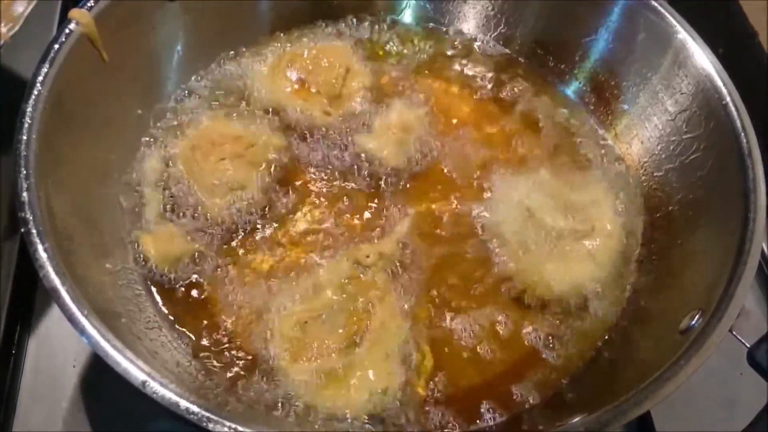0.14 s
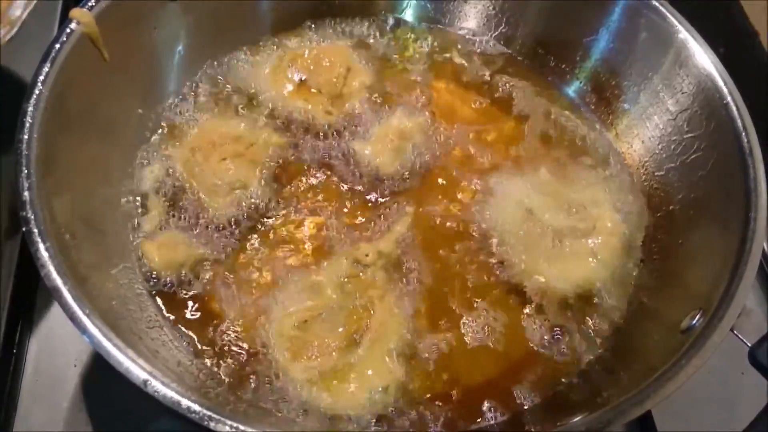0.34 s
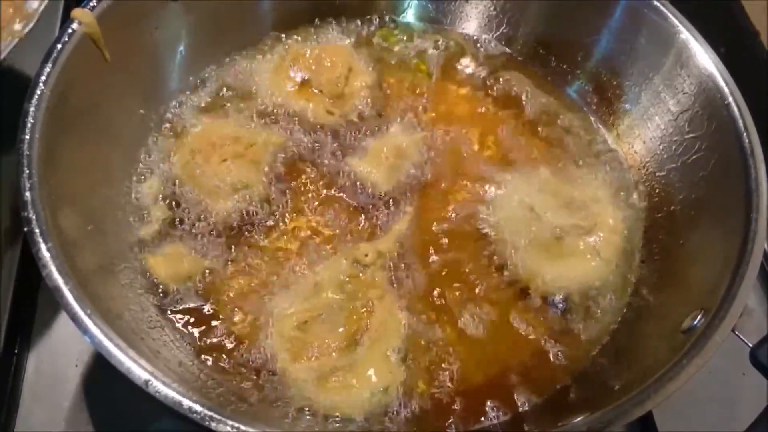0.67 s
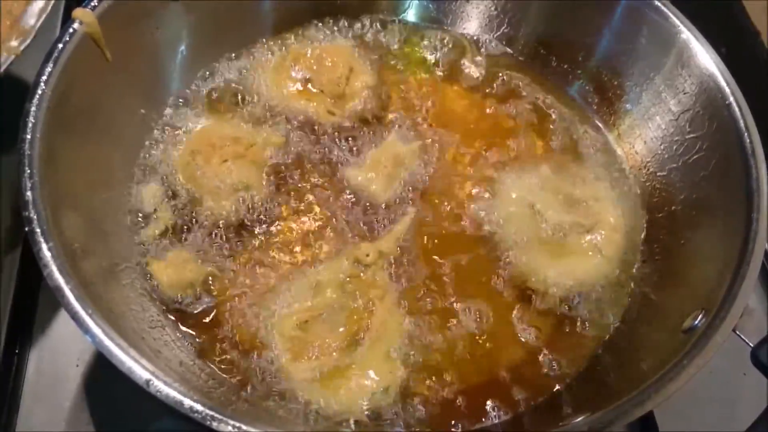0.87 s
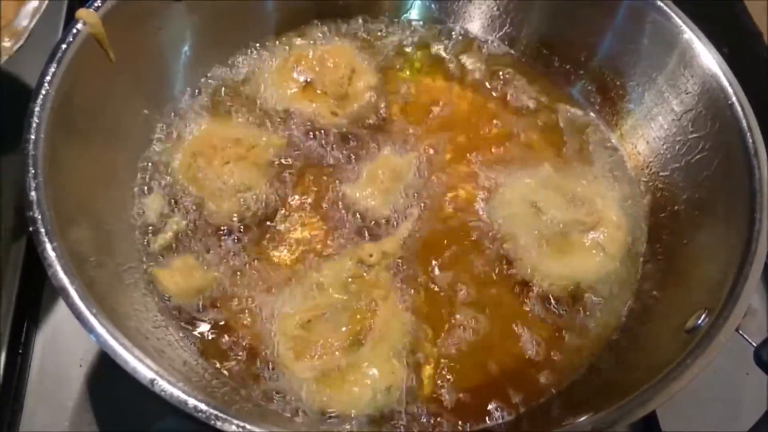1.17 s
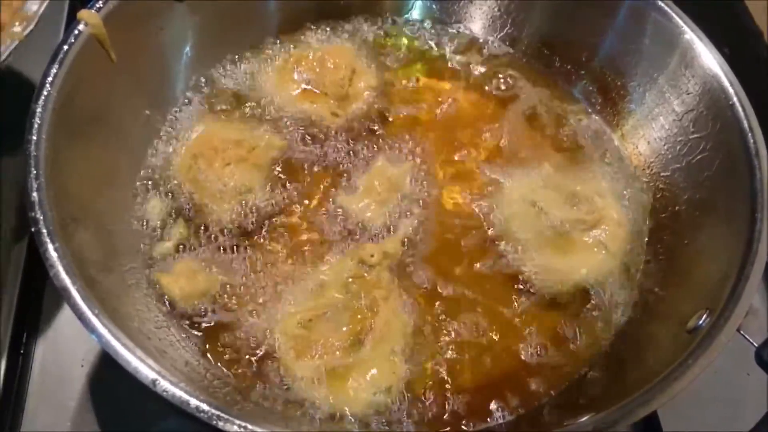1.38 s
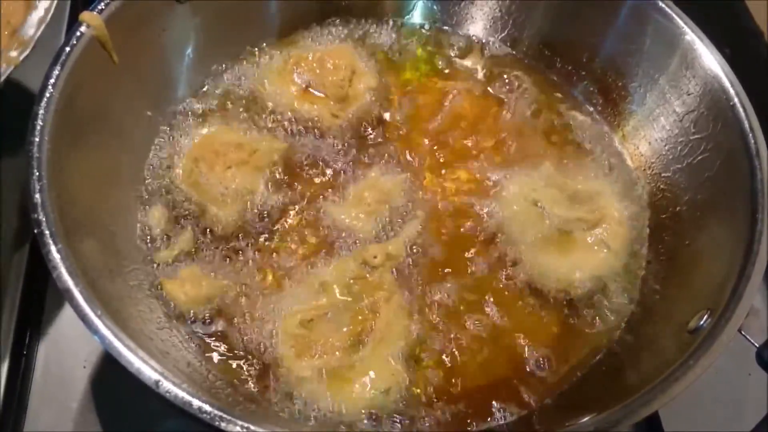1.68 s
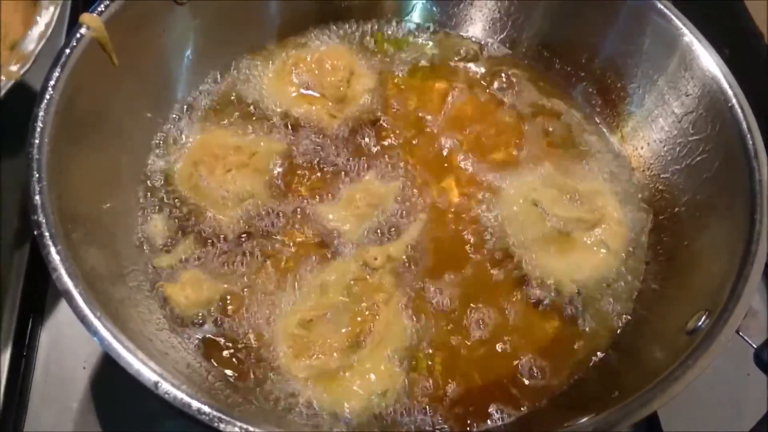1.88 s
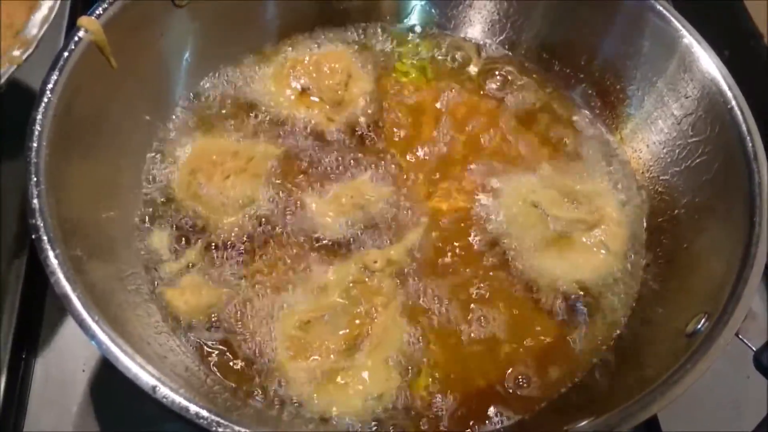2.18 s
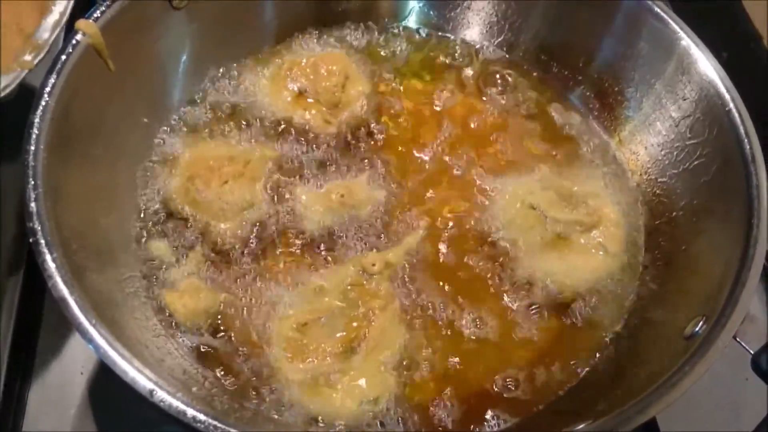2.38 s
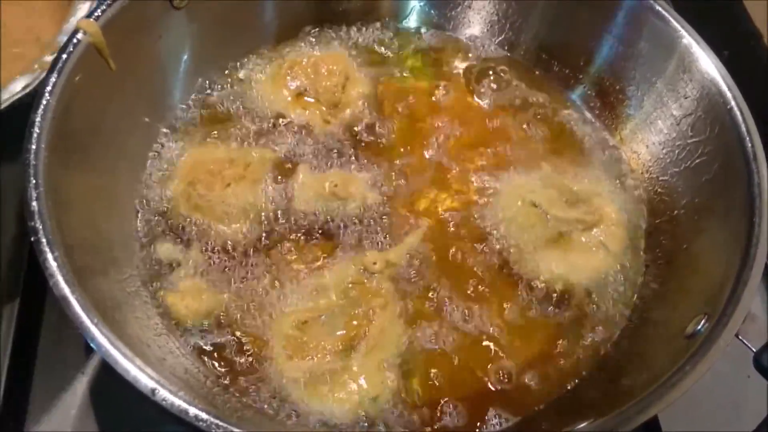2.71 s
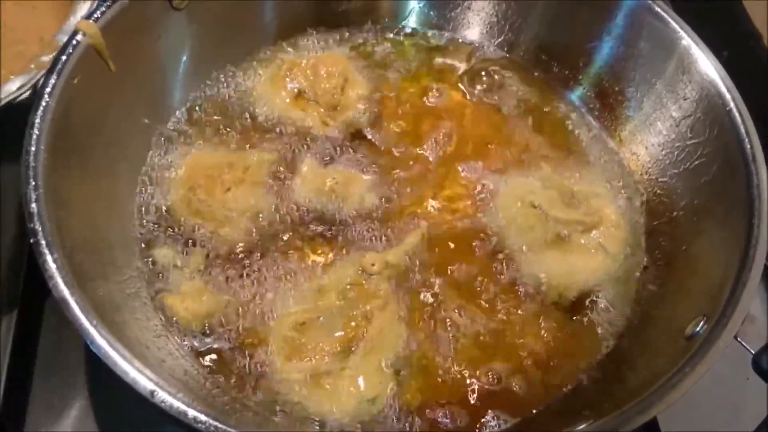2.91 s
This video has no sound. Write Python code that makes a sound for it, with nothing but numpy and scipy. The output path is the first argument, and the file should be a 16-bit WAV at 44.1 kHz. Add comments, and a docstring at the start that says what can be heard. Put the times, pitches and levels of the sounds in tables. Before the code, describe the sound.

Deep-frying food makes a steady, hissing sizzle close to the microphone. Scattered pops and bubbly plops ring briefly in the pan and grow more frequent, with a louder plop near the end, above a soft kitchen rumble.

```python
"""A dense sizzle, dotted with pops: battered slices deep-fry in a steel pan in a small kitchen.
Countless tiny steam bubbles sizzle, larger ones crackle, and the largest pop with a short ring that
the pan and room echo. A phone is held close: its two microphone ports colour the sound differently,
and the left hears the pan first. Underneath lies a low rumble of flame and kitchen, which the phone's
processing puts in opposite phase between left and right."""
import sys
import numpy as np
from scipy import signal
from scipy.fft import rfft, irfft, next_fast_len
from scipy.io import wavfile

SR = 44100
rng = np.random.default_rng(int(sys.argv[2]) if len(sys.argv) > 2 else 0)


def wav_record(signal):
    """Record a signal, one row per channel, as 16-bit PCM in the file named by sys.argv[1]."""
    frames = np.transpose(np.atleast_2d(signal))
    bounded = np.clip(frames, -1, 1)
    # unit amplitude maps onto the largest positive 16-bit level
    quanta = np.round(bounded * 32767).astype(np.int16)
    wavfile.write(sys.argv[1], SR, quanta)


N = 134505
TIME_S = np.arange(N) / SR


# Vigour of the frying, close to the pan: time_s, level_db
SIZZLE_VIGOUR = [(0, -51), (1.5, -50), (2.1, -48), (2.45, -50), (2.65, -49.5), (3.05, -50)]
def sizzle(vigour_db):
    """Tiny steam bubbles burst so thickly that their clicks merge."""
    return from_db(vigour_db) * pair(lambda: rms_one(clicks(per_s=9000, spread_db=2.5)), diffuse=0.73)


# Loud pops in the oil, close to the phone:
# start_s, level_db, centre_hz, left_over_right_db, width_octaves, edge_over_body_db
LOUD_POPS = [(0.1272, -36.5, 7000, 5.5, 0.24, -21.9), (0.4527, -35.5, 3140, -2, 0.61, -20),
             (0.5248, -39.5, 5000, -1, 1.1, 0), (0.6615, -28, 3780, 1, 0.61, -9),
             (0.9126, -38, 3370, -2.5, 2.6, -12.9), (1.1565, -35, 7600, -4, 0.6, -19),
             (1.2148, -29.5, 5170, -1.5, 1, -16), (1.2287, -30, 9500, 0.5, 0.58, -6),
             (1.2488, -35, 10000, 0, 0.93, -2), (1.5051, -23.5, 5180, 0, 0.44, -13.9),
             (1.51, -32, 5070, -11, 0.82, -14.9), (1.5348, -33.5, 3970, -5, 1.7, -11),
             (1.5948, -33, 5600, -6, 1.1, -1.5), (1.7462, -38.5, 9010, 1, 0.72, -11.9),
             (1.8128, -37, 3600, -4.2, 0.84, -4), (1.8978, -32, 7310, -1.5, 1.5, -3),
             (1.943, -33.5, 8110, -1, 1.8, -14), (1.9938, -35, 9490, 0, 1.2, -16),
             (2.0074, -35.5, 7900, -2, 0.45, 0), (2.0427, -34.5, 10000, 1.5, 0.65, -14),
             (2.0569, -35, 10000, -2, 0.82, 0), (2.1008, -35.5, 8110, -1.5, 0.77, -13),
             (2.1676, -38.5, 10200, -2, 0.63, 1), (2.1934, -37.5, 10000, -1, 0.53, -10),
             (2.2121, -34, 7700, 5, 1.26, -9.9), (2.2212, -34, 6800, 2.1, 0.62, -12.9),
             (2.275, -35, 10000, 1, 1, -17), (2.3162, -36, 9490, 1, 1.3, -7.9),
             (2.3355, -38, 3840, 0.5, 2.4, -15.9), (2.3826, -31.5, 9700, 2.1, 0.68, -21.9),
             (2.4081, -34, 9800, 1, 0.65, -20), (2.4357, -33, 10000, -6, 1.2, -12.9),
             (2.4408, -30, 7060, 0.1, 1.16, -16), (2.446, -32.5, 5000, 4, 0.6, -12),
             (2.464, -31, 8500, -3, 0.78, -14.9), (2.4746, -31, 8050, 0.5, 0.49, -20),
             (2.481, -41, 7700, 1, 0.58, -11.9), (2.5212, -33, 8900, 2, 0.88, -25),
             (2.611, -36.5, 9400, 1, 1.4, -19), (2.743, -35.5, 9490, -2, 0.88, -2),
             (2.756, -43, 10000, -5, 0.94, 0), (2.767, -33.5, 10000, -3, 1.17, -8.9),
             (2.7716, -34.5, 7500, 1, 0.74, -13), (2.824, -29, 2110, -4, 0.43, -6.5)]
def pops(size=512, floor_hz=1000, edge_hz=7600, left_late_s=0.00021, spread_s=0.00008):
    """The largest bubbles burst, each a splat of noise about its centre with a sharp treble edge."""
    out = np.zeros((2, N + 2 * size))
    t = np.arange(size) / SR
    freq = np.arange(size // 2 + 1) * SR / size + 1
    edge_colour = 1 / (1 + (edge_hz / freq) ** 7.8)

    def burst(colour, length_ms, rise_ms=0.27):
        shape = (1 - np.exp(-1000 * t / rise_ms)) * np.exp(-1800 * t / length_ms)
        phase = np.angle(rfft(rng.standard_normal(size) * shape))
        splat = irfft(colour * np.exp(1j * phase)) * np.sqrt(shape)
        return splat / np.sqrt(np.sum(splat ** 2))

    for start_s, level_db, centre_hz, balance_db, octaves, edge_db in LOUD_POPS:
        length_ms = 2.83 * np.sqrt(5000 / centre_hz)  # lower pops last longer
        peak = (1 + (np.log2(freq / centre_hz) / octaves) ** 2) ** -1.42
        colour = peak / np.sqrt(freq) / (1 + (floor_hz / freq) ** 2.2)
        pop = burst(colour, length_ms) + from_db(edge_db) * burst(edge_colour, length_ms=4.1)
        pop *= np.sqrt(length_ms * SR / 1600)  # longer pops carry more energy
        spot_s = spread_s * rng.standard_normal()  # each bursts at a different spot in the pan
        for side, late_s, side_db in ((0, left_late_s, balance_db / 2), (1, spot_s, -balance_db / 2)):
            i = int((start_s + late_s) * SR)
            out[side, i:i + size] += from_db(level_db + side_db) * pop
    return out[:, :N]


# Pitched plops in the pan, heard at both ports: start_s, level_db, pitch_hz, ring_ms
BUBBLE_PLOPS = [(0.1824, -41, 1516, 2.8), (.453, -40.5, 3750, 3.2), (0.4542, -33.5, 1686, 2.9),
                (.607, -44.5, 1490, 5.4), (0.6615, -31, 3884, 5.4), (0.6635, -35, 2810, 4),
                (0.899, -44, 1450, 3.7), (.9127, -42, 3580, 4.4), (.941, -42, 2310, 4.4),
                (.995, -46, 3970, 5.6), (0.997, -39.5, 3480, 1.9), (1.005, -48, 3600, 3),
                (1.215, -37, 1400, 2.2), (1.3845, -30.5, 5700, 1.7), (1.387, -40.5, 1460, 2.6),
                (1.465, -28, 5960, 2), (1.5055, -26.5, 5450, 2.2), (1.535, -29.5, 3600, 2.5),
                (1.535, -38, 1460, 2.5), (1.5387, -37, 3800, 3.7), (1.573, -30, 3800, 1.7),
                (1.619, -42, 1490, 3.1), (1.8127, -29, 1692, 3.3), (1.937, -42, 3900, 3),
                (1.97, -34.5, 7130, 2), (2.2266, -32, 6600, 2.3), (2.815, -39, 2150, 2.4),
                (2.8238, -29.5, 1654, 3.8), (2.8238, -21, 2286, 3.7), (2.8242, -32.5, 2790, 4)]
def plops():
    """A large bubble rings as a sine that swells quickly and dies away."""
    out = np.zeros(N)
    for start_s, level_db, pitch_hz, ring_ms in BUBBLE_PLOPS:
        age_s = TIME_S - start_s
        swell = np.clip(3000 * age_s / ring_ms, 0, 50)  # loudest a third of the way into ring_ms
        out += from_db(level_db) * swell * np.exp(1 - swell) * np.sin(2 * np.pi * pitch_hz * age_s)
    return out


def crackle(vigour_db):
    """Small bubbles burst brightly, louder and more often as the sizzle grows."""
    swing = from_db(vigour_db - vigour_db.mean())
    bursts = bubbles(per_s=250 * swing, spread_db=3.6, low_hz=4670, high_hz=15400, cycles=4.1)
    return from_db(-61) * swing * bursts


def simmer():
    """The oil bubbles softly, pitched below the crackle."""
    return from_db(-58.5) * bubbles(per_s=500, spread_db=2.35, low_hz=920, high_hz=4600, cycles=4.56)


def hiss():
    """The finest sizzle is a steady hiss in the top treble."""
    return from_db(-53) * high_pass(rng.standard_normal((2, N)), hz=10400)


# Flame and kitchen behind the frying: frequency_hz, level_db
RUMBLE_SPECTRUM = [(20, -29), (60, -2.5), (150, 1.4), (300, -1.5), (430, -9), (650, 4), (1000, -8.5),
                   (2000, -7), (4500, -32)]
def rumble(swell_s=2.81, half_length_s=0.041, swell_db=7.5):
    """Flame and kitchen make a low rumble; the level swells once, briefly."""
    noise = pair(lambda: rms_one(coloured(rng.standard_normal(N), RUMBLE_SPECTRUM)), diffuse=0.16)
    swell = np.exp(-((TIME_S - swell_s) / half_length_s) ** 2)
    polarity = [[-1], [1]]  # the phone's processing puts left and right in opposite phase
    return from_db(-58.5 + swell_db * swell) * noise * polarity


# Echo off the steel wall of the pan: delay_s, level_db
PAN_WALL = [(.0037, -10.5)]
# Reverberation of the small kitchen, heard from beside the pan: low_hz, high_hz, t60_s, level_db
KITCHEN_TAIL = [(198, 3730, 0.29, -2), (2340, 5300, 0.13, -12), (5800, 21600, 0.22, -3.5)]
def pan_and_kitchen(x, build_s=0.0015):
    """The direct sound, an echo off the pan wall and a diffuse tail that differs at each port."""
    t = np.arange(SR // 2) / SR
    response = np.zeros((2, len(t)))
    for low_hz, high_hz, t60_s, level_db in KITCHEN_TAIL:
        band_pass = signal.butter(2, [low_hz, high_hz], "band", fs=SR, output="sos")
        band = signal.sosfilt(band_pass, rng.standard_normal(response.shape))
        decay = from_db(-60 * t / t60_s) * (1 - np.exp(-(t / build_s) ** 2))
        response += from_db(level_db) * band * decay / np.sqrt(np.sum(decay ** 2))
    response[:, 0] = 1
    for delay_s, level_db in PAN_WALL:
        response[:, int(delay_s * SR)] += from_db(level_db)
    return signal.fftconvolve(x, response, axes=1)[:, :N]


def bubbles(per_s, spread_db, low_hz, high_hz, cycles):
    """Bubbles burst at random, each ringing at one of 16 pitches; rms 1."""
    bursts = clicks(per_s, spread_db)
    pitch_index = rng.integers(0, 16, N)
    pitches_hz = np.geomspace(low_hz, high_hz, 16)
    return rms_one(sum(ring(bursts * (pitch_index == k), hz, cycles) for k, hz in enumerate(pitches_hz)))


def ring(kicks, hz, cycles):
    """Each click sets a sine ringing that falls 20 dB over the given cycles."""
    decay, step = from_db(-20 * hz / (cycles * SR)), 2 * np.pi * hz / SR
    return signal.lfilter([0, np.sin(step)], [1, -2 * decay * np.cos(step), decay ** 2], kicks + 1e-18)


def clicks(per_s, spread_db):
    """Random clicks of uneven size and sign."""
    sizes = from_db(spread_db * np.minimum(rng.exponential(1, N), 5)) * rng.choice([-1, 1], N)
    return sizes * (rng.random(N) < per_s / SR)


def pair(make, diffuse):
    """Each port has its own diffuse share of the power; the rest is common to both."""
    return np.sqrt(1 - diffuse) * make() + np.sqrt(diffuse) * np.array([make(), make()])


def coloured(x, points):
    """Causal (minimum-phase) filter through points of frequency_hz, gain_db."""
    size = next_fast_len(N + 4096)
    size += size % 2
    points_hz, points_db = np.transpose(points)
    freq = np.arange(size // 2 + 1) * SR / size + 1
    gain_db = np.interp(np.log(freq), np.log(points_hz), points_db)
    cepstrum = irfft(gain_db * np.log(10) / 20, size)
    cepstrum[1:size // 2] *= 2
    cepstrum[size // 2 + 1:] = 0
    return irfft(rfft(x, size) * np.exp(rfft(cepstrum)), size)[..., :N]


def high_pass(x, hz):
    return signal.sosfilt(signal.butter(2, hz, "high", fs=SR, output="sos"), x)


def from_db(db):
    return 10 ** (np.asarray(db) / 20)


def rms_one(x):
    return x / np.sqrt(np.mean(x ** 2) + 1e-20)


def scene(right_late_s=0.00055):
    """The frying pan close up, reaching the left port first, over the rumble of flame and kitchen."""
    vigour_db = np.interp(TIME_S, *np.transpose(SIZZLE_VIGOUR))
    fine_sizzle = sizzle(vigour_db)
    bubbling = crackle(vigour_db) + simmer()
    background = rumble()
    frying = fine_sizzle + hiss() + pan_and_kitchen(pops() + plops() + bubbling)
    frying = high_pass(frying, hz=477)
    frying[1] = np.roll(frying[1], int(right_late_s * SR))
    return frying + background


# Response of the phone's left and right microphone ports: frequency_hz, gain_db
LEFT_RESPONSE = [(700, -2.5), (1300, -3), (2200, -1), (3000, 1.5), (4600, 0), (5400, 6), (6100, 4.5),
                 (6800, 5), (7500, 8.5), (9500, 7.5), (10700, -2.5), (13000, -13.5), (15500, -7)]
RIGHT_RESPONSE = [(700, 3), (1350, 10), (1700, 7.5), (2100, 4.5), (3200, 7), (3650, 12), (4050, 13.5),
                  (4700, -1.5), (5500, 0), (6800, 3.5), (8500, -0.5), (11000, -2.5), (15500, -2)]
def record(dry, low_cut_hz=13, high_cut_hz=15800):
    """Each port adds its colour; subsonic rumble and the very top are cut."""
    ports = np.array([coloured(dry[0], LEFT_RESPONSE), coloured(dry[1], RIGHT_RESPONSE)])
    ports = high_pass(ports, low_cut_hz)
    return signal.sosfilt(signal.ellip(12, .5, 60, high_cut_hz, fs=SR, output="sos"), ports)


dry = scene()
out = record(dry)
wav_record(out)
```